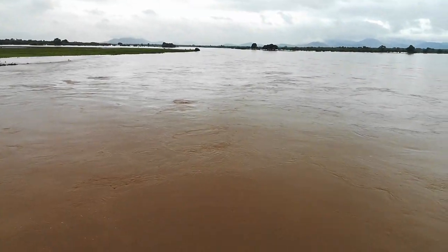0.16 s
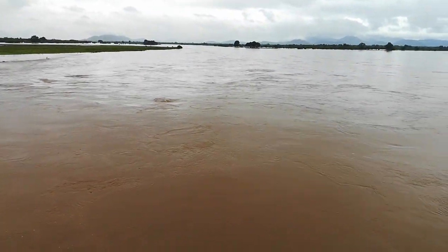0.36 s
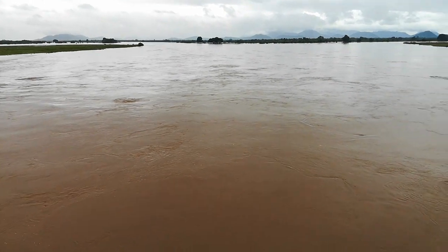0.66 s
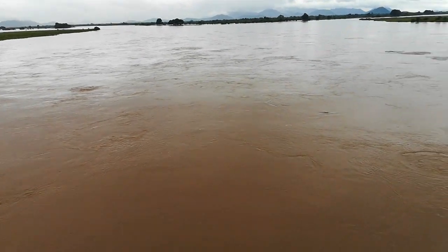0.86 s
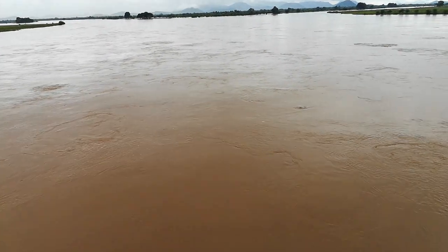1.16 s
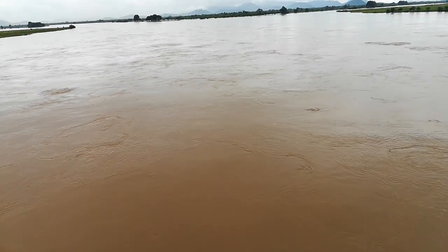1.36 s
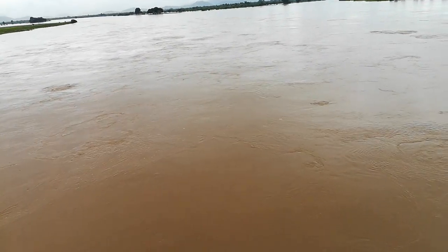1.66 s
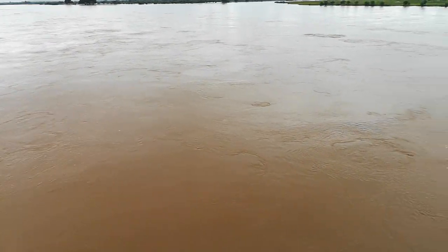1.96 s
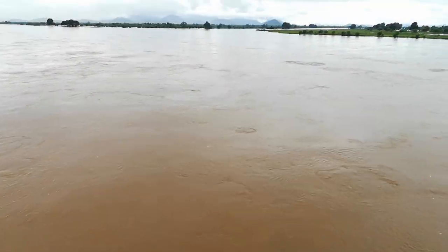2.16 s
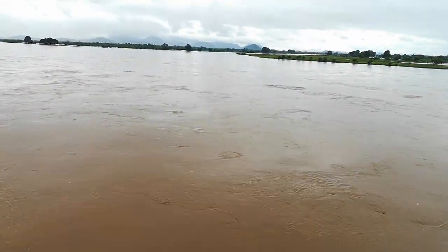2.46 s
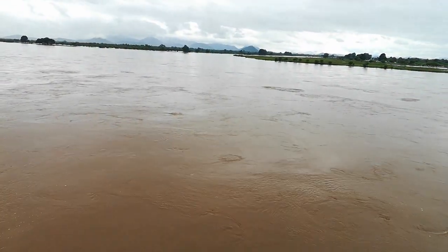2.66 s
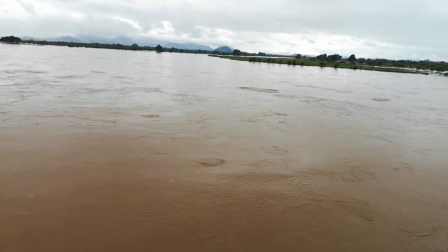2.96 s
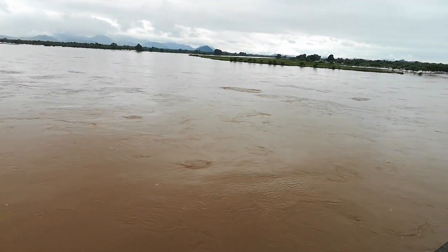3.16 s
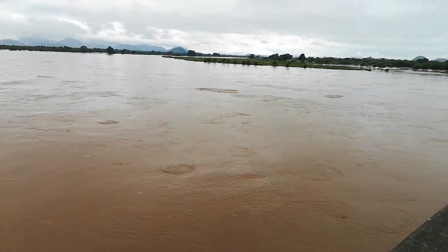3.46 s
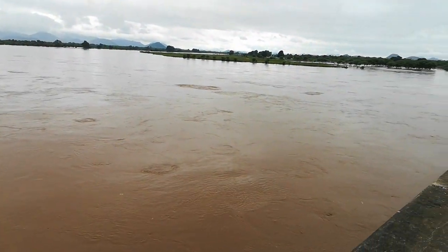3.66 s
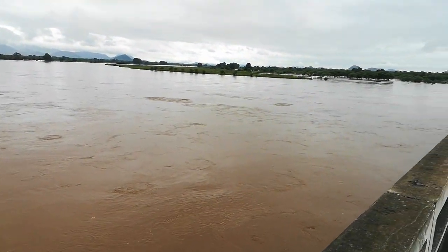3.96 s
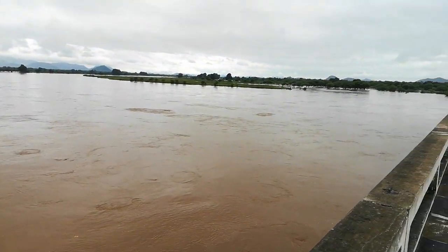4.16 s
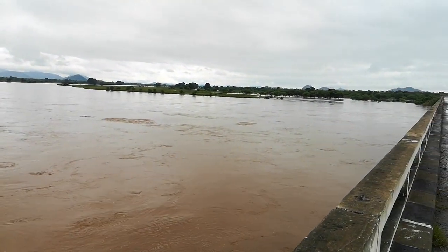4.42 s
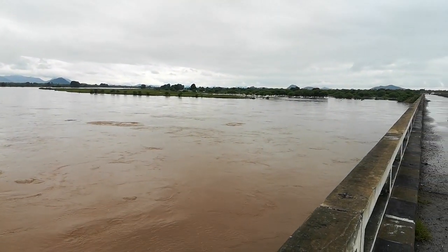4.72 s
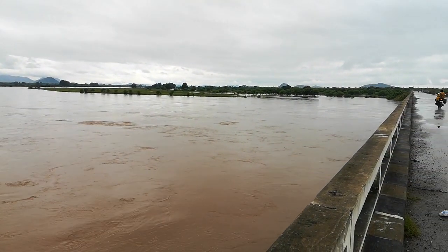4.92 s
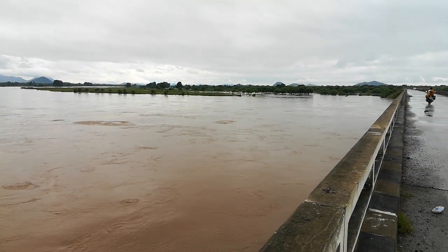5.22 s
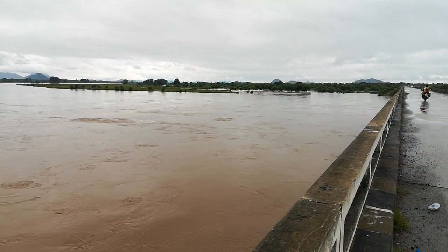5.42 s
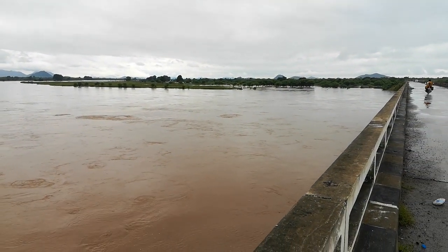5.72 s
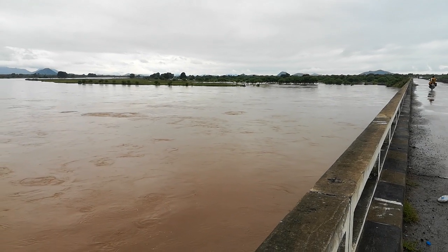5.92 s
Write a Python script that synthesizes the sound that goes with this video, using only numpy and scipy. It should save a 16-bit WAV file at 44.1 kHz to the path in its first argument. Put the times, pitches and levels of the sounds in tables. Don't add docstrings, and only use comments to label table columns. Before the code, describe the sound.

Wind thumps and pops on a hand-held microphone on a wet bridge as a single-cylinder engine thuds past, tyres hissing through spray and drops ticking.

```python
import sys
import numpy as np
from scipy import signal
from scipy.fft import rfft, irfft, next_fast_len
from scipy.io import wavfile
from scipy.ndimage import uniform_filter1d, map_coordinates

SR = 44100
rng = np.random.default_rng(int(sys.argv[2]) if len(sys.argv) > 2 else 0)


def gain_from_db(level_db):
    decades = np.asarray(level_db, float) / 20
    return 10 ** decades


def dump(signal):
    limited = np.clip(np.atleast_2d(signal).T, -1, 1)
    pcm = np.round(limited * 32767).astype(np.int16)
    wavfile.write(sys.argv[1], SR, pcm)


N = 268391


def unit(x):
    return x / np.sqrt(np.mean(x ** 2) + 1e-20)


def along(points, hz):
    f, v = np.transpose(points)
    return np.interp(np.log(hz + 1), np.log(f + 1), v)


def curves(rows):
    s, *cols = np.transpose(rows)
    return [np.interp(np.arange(N) / SR, s, c) for c in cols]


def full(coarse):
    return np.interp(np.arange(N), np.arange(0, N, 64), coarse)


def wobble(rate):
    knots = rng.standard_normal(int(N * 40 / SR) + 4)
    return full(map_coordinates(knots, [np.arange(0, N, 64) * min(rate, 40) / SR]))


def swells(rows):
    s, half, db = np.array(rows)[:, :3].T[:, :, None]
    u = (np.arange(0, N, 64) / SR - s) / half
    rise_over_fall = 0.97
    return db * np.exp(-np.where(u < 0, u / rise_over_fall, u) ** 2)


def filtered(x, response):
    m = next_fast_len(N + 8192)
    return irfft(rfft(x, m) * response(np.fft.rfftfreq(m, 1 / SR)), m)[..., :N]


def mode(f, hz, width):
    return 1j * f * width / (hz * hz - f * f + 1j * f * width)


def panned(x, db):
    return x * 2 / (1 + gain_from_db([-db, db]).reshape(2, -1))


# (f/Hz, lag/ms)
PORT_LAG_MS = [(60, .9), (330, 1.0), (650, .8), (1300, .4), (9000, .4)]
# (t/s, bearing -1 left to 1 right)
BEARING = [(0, 0.21), (.3, -0.46), (.7, -0.79), (1.5, -0.95), (1.85, -0.84), (2.1, 0.95), (4.5, 0.72),
           (6.09, 0.7)]


def lag(hz, t, side=1):
    bearing = side * np.interp(t, *np.transpose(BEARING))
    turn = np.pi * (hz * along(PORT_LAG_MS, hz) / 1000)[:, None] * bearing
    return np.exp([-1j * turn, 1j * turn])


def traffic_side(share=1):
    return -11.5 * share * curves(BEARING)[0]


def aside(x, side=1):
    hz, t, z = signal.stft(x, SR, nperseg=1024)
    return signal.istft(z * lag(hz, t, side), SR, nperseg=1024)[1][:, :N]


# (f/Hz, share 0-1)
ALIKE = [(60, .98), (160, .9), (330, .83), (650, .8), (1300, .4), (4000, .55), (7000, .54), (12000, .5)]


def rush(spectrum, patchy_db, grain=0, size_db=0, count=0, size=512):
    clicks = np.zeros(N)
    clicks[rng.integers(0, N, count)] = gain_from_db(size_db * np.minimum(rng.exponential(size=count), 3))
    burst = np.convolve(clicks, np.hanning(60))[:N]
    noise = rng.standard_normal((3, N)) * (1 + grain * unit(burst))
    hz, t, z = signal.stft(noise, SR, nperseg=size)
    patches = uniform_filter1d(rng.standard_normal(z.shape[1:]), size=8, axis=0)
    patches = uniform_filter1d(patches, size=9, axis=1)
    share = np.clip(along(ALIKE, hz), 0, 1)[:, None]
    z = np.sqrt(share) * z[0] * lag(hz, t) + np.sqrt(1 - share) * z[1:]
    z = z * gain_from_db(along(spectrum, hz)[:, None] + patchy_db * unit(patches))
    return unit(signal.istft(z, SR, nperseg=size)[1][:, :N])


# (t/s, level/dB)
WIND = [(0, -57.5), (.45, -42.5), (.9, -34), (1.5, -37), (2.2, -33.5), (3.1, -35.5), (3.9, -38), (4.7, -45),
        (5.2, -38), (6.09, -46)]
# (peak t/s, half length/s, swell/dB, share of the swell reaching the chesty band)
GUSTS = [(0, 0.14, 10, 1.4), (.19, 0.089, 13.5, 0), (.52, 0.057, 13.5, 0.06), (.65, 0.062, 14, 0.9),
         (.76, 0.074, 11, 0.36), (1.22, 0.041, 4, 0), (1.64, 0.15, 2, 2.8), (1.73, 0.025, 6, 0.1),
         (1.82, 0.026, -5, 0.1), (2.07, 0.08, 4, 0.3), (2.25, 0.091, 7, 1.3), (2.41, 0.1, 4, 1.7),
         (2.55, 0.16, 1.44, 5.7), (2.78, 0.033, 8, 1.1), (2.83, 0.012, -27.5, 0), (2.88, 0.015, 6.5, 0.7),
         (3.03, 0.11, 2, 4), (3.13, 0.084, 2.5, 2.34), (3.32, 0.065, 0.5, 0), (3.5, 0.043, 3.5, 0.4),
         (4.36, 0.14, 5.5, 0.7), (4.75, 0.27, 0.8, 5), (4.95, 0.052, 8.5, 0), (5.04, 0.022, -5, 0),
         (5.87, 0.074, 7, 0)]
# (t/s, level/dB)
TRAFFIC = [(0, -30), (.2, -51), (1.25, -42), (1.6, -32.5), (1.95, -35), (2.25, -33.5), (2.6, -33.5),
           (3.2, -34), (3.45, -35), (4, -35), (4.7, -38.5), (6.09, -38.5)]
# (f/Hz, level/dB)
DEEP = [(13, -34), (22, -14.5), (48, -7.5), (70, -5.5), (92, -4.5), (120, -4), (200, -120)]
# (f/Hz, level/dB)
HUM = [(56, -57), (95, -15.5), (129, 3), (167, 2), (230, -6), (300, -11.5), (510, -120)]
# (f/Hz, level/dB)
CHEST = [(130, -2.5), (225, -2.5), (290, -5), (323, -5), (356, -6.5), (600, -25.5), (780, -34),
         (1320, -120)]


def rumble():
    wind_db, gusts = curves(WIND)[0], swells(GUSTS)
    gust_db = full(gusts.sum(axis=0))
    bite_db = full(np.array(GUSTS)[:, 3] @ gusts)
    chest_db = -43.5 + 0.25 * (wind_db - wind_db.mean()) + bite_db
    lump = wobble(16)
    deep = gain_from_db(wind_db + gust_db + 1.0 + 0.62 * lump) * rush(DEEP, patchy_db=-2.1, size=8192)
    hum_db = curves(TRAFFIC)[0] + 0.23 * gust_db
    hum = gain_from_db(hum_db + 2.3 * lump) * rush(HUM, patchy_db=1.6, size=4096)
    chest = gain_from_db(chest_db + 3.5 + 0.44 * lump + 0.1 * wobble(25)) * rush(CHEST, patchy_db=1.2, size=2048)
    return (deep + hum) * gain_from_db([[-.2], [.2]]) + chest * gain_from_db([[-1.3], [1.3]])


# (closest t/s, roar level/dB, tread level/dB, growl level/dB, time to cover closest distance/s)
PASSES = [
    (.36, -52, -45, -71, 0.095),
    (1.98, -42.5, -47, -49, 0.098),
    (2.18, -49, -44.5, -48.5, .24),
]
# (peak t/s, half length/s, swell/dB)
JOINTS = [
    (2.325, 0.0049, 8.5),
    (3.64, 0.017, 13),
]
# (peak t/s, half length/s, swell/dB)
SURGES = [
    (.17, 0.15, -11),
    (1.5, 0.11, 4),
    (2.33, 0.11, -5.5),
    (3.05, .3, 4),
    (3.8, 0.18, 1.5),
    (5, .3, -1),
]
# (f/Hz, level/dB)
TYRES = [(500, -51), (720, -6.5), (868, -1), (1230, -5.5), (1600, -8), (1900, -11), (2470, -19),
         (4180, -120)]
# (f/Hz, level/dB)
GROWL = [(260, -55), (450, -3), (576, -1), (720, 0.5), (950, -27), (1500, -120)]
# (f/Hz, level/dB)
TREAD = [(1060, -4.5), (1800, -12.5), (2170, 0), (2430, -6), (2800, -3.5), (3640, -3), (6160, -120)]


def roar():
    s, roar_db, tread_db, growl_db, reach = np.transpose(PASSES)[:, :, None]

    def near(db, late=0, carries=1):
        away = (np.arange(N) / SR - s - late) / reach / carries
        return (gain_from_db(2 * db) / (1 + away ** 2)).sum(axis=0)

    tyres = near(roar_db)
    treads = near(tread_db, carries=2.18)
    growls = near(growl_db, late=0.14)
    level = tyres + gain_from_db(2 * -52)
    joint_db = full(swells(JOINTS).sum(axis=0))
    surge_db = full(swells(SURGES).sum(axis=0))
    pan_db = traffic_side(tyres / level) - 0.9

    low = np.sqrt(level) * gain_from_db(4.0 + 0.19 * joint_db + 0.77 * wobble(11))
    low = low * rush(TYRES, patchy_db=1.0, size=1024)
    growl = np.sqrt(growls + gain_from_db(2 * -57.5)) * gain_from_db(4.5 + surge_db + 0.47 * wobble(5.5))
    low = low + growl * rush(GROWL, patchy_db=0.9, size=1024)
    tread = np.sqrt(treads + gain_from_db(2 * -57)) * gain_from_db(0.5 + joint_db + 0.81 * wobble(5.33))
    tread = tread * rush(TREAD, patchy_db=1.5, grain=0.29, size_db=-9, count=500)
    return panned(low, pan_db) + panned(tread, 0.18 * pan_db - 0.5)


# (t/s, level/dB)
SPRAY = [(0, -51), (.25, -50.5), (.5, -40.5), (1.3, -43.5), (1.9, -39), (2.6, -40), (3.2, -42.5), (4, -48),
         (4.4, -53), (6.09, -56)]
# (peak t/s, half length/s, swell/dB, droplet pitch f/Hz)
PUDDLES = [(0.037, 0.02, 15, 5100), (0.043, 0.018, 11, 10600), (0.276, 0.14, 6.5, 8800),
           (0.504, 0.0056, 14, 7700), (0.79, 0.18, 8, 6200), (.842, .003, 11, 13500),
           (0.868, 0.18, -4.5, 8500), (0.95, 0.23, 10.5, 12500), (1.03, 0.25, 5, 3850),
           (1.053, 0.035, 5.5, 6200), (1.165, 0.12, 7.5, 8900), (1.264, 0.28, 6.5, 4200),
           (1.415, 0.19, 9.5, 8300), (1.54, 0.041, 18.5, 5320), (1.4, 0.43, 3.5, 12500),
           (1.13, .006, 6, 13300), (.505, 0.011, 2, 12500), (1.34, 0.0087, 11, 12500),
           (.86, 0.023, 2, 6600), (2.87, 0.013, 3, 4700), (3.31, 0.022, 5, 4300), (1.67, 0.06, 11.5, 5360),
           (2.195, 0.21, 7.5, 5660), (2.202, 0.082, 6, 12500), (2.26, 0.027, -10, 8550),
           (2.53, 0.22, 4.5, 8600), (2.69, .06, 1, 12500), (3.03, 0.022, 2.5, 6700), (3.3, 0.49, -7, 13100),
           (3.405, 0.14, 25, 2950), (3.728, 0.14, 4, 5070), (4.64, 0.11, 9, 11000), (4.73, 0.18, 5, 4830),
           (4.96, 0.16, 8, 12500), (4.967, 0.073, 3.5, 6700), (5.723, 0.12, 4, 4400)]
# (pitch f/Hz, level at middling spray/dB, growth with the spray dB/dB)
DROPLETS = [
    (4200, -47, 0.53),
    (6550, -44.5, 0.8),
    (8600, -52, 0.41),
    (12500, -67.5, 0.76),
]
# (f/Hz, level/dB)
SPLASH = [(1530, -23), (2600, 0.5), (3150, 1.5), (3750, 2), (4550, 7.5), (5280, 5.5), (5800, -1),
          (11000, -60)]
# (f/Hz, level/dB)
SIZZLE = [(3060, -24), (5200, -8), (6690, 4), (8200, -6), (10700, -66), (18000, -120)]
# (f/Hz, level/dB)
FIZZ = [(4650, -17), (7900, -1), (9100, -7.5), (10300, -19.5), (13400, -32), (22000, -120)]
# (f/Hz, level/dB)
MIST = [(6000, -34), (10200, 0), (14600, -4.5), (15600, -8.5)]
# (t/s, level/dB)
SLOSH = [
    (5.45, -71),
    (5.58, -51.5),
    (5.7, -48.5),
    (5.8, -50),
    (5.84, -82),
]
# (f/Hz, level/dB)
FAR_PUDDLE = [(1240, -41), (2100, -1), (2480, 10), (3400, 3), (3900, -12), (4810, -37), (8140, -120)]


def spray():
    more_db = curves(SPRAY)[0] + 45
    puddles, pitch = swells(PUDDLES), np.array(PUDDLES)[:, 3]
    levels = []
    for hz, db, grows in DROPLETS:
        kinship = np.exp(-(np.log2(pitch / hz) / 0.34) ** 2)
        puddle_db = full(kinship @ puddles)
        levels.append(db + grows * more_db + puddle_db)
    splash_db, sizzle_db, fizz_db, mist_db = levels
    pan_db = -13.5 - 0.45 * more_db + 0.55 * wobble(6.23)
    mist_pan_db = -1.5 - 0.73 * puddle_db

    swell = wobble(9.9)
    splash = gain_from_db(splash_db + 1.5 + 0.2 * swell)
    splash = splash * rush(SPLASH, patchy_db=1.5, grain=0.37, size_db=-3, count=600)
    sizzle = gain_from_db(sizzle_db + 3.0 + 0.25 * swell)
    sizzle = sizzle * rush(SIZZLE, patchy_db=1.5, grain=0.27, size_db=-5.0, count=900)
    fizz = gain_from_db(fizz_db + 4.5 + 0.29 * swell)
    fizz = fizz * rush(FIZZ, patchy_db=1.5, grain=0.31, size_db=-1, count=900)
    mist = gain_from_db(mist_db + 4.5 + 0.34 * swell)
    mist = mist * rush(MIST, patchy_db=1.5, grain=0.17, size_db=-7, count=300)
    slosh = gain_from_db(curves(SLOSH)[0]) * rush(FAR_PUDDLE, patchy_db=2.5, grain=0.46, size_db=-5, count=900)
    coarse = panned(splash, 0.5 * pan_db) + panned(sizzle, pan_db)
    fine = panned(fizz, 0.69 * pan_db) + panned(mist, mist_pan_db)
    return coarse + fine + slosh


# (t/s, peak level/dB, half width/ms)
POPS = [(.003, -20, .6), (.0165, -21, .5), (.0228, -14, .35), (.041, -13, .3), (.0485, -16, .5),
        (.0555, -20, .6), (.1035, -17, .7), (.64, -20, 1), (.655, -16, .6), (2.535, -12, .4),
        (2.6, -29, .5), (3.06, -23, 1), (3.13, -23, 1)]


def pops():
    out = np.zeros((2, N + 600))
    t = np.arange(-300, 300) / SR - [[.0007], [0]]
    for s, db, ms in POPS:
        u = t / ms * 1000
        push = (1 - .6 * u ** 2) * np.exp(-u ** 2 / 2)
        out[:, round(s * SR):][:, :600] += gain_from_db(db) * push * gain_from_db([[-4], [0]])
    return out[:, 300:N + 300]


# (t/s, firings so far)
CRANK = [(-.005, 0), (.291, 8), (.59, 16), (.817, 22), (1.0055, 27), (1.4225, 38), (1.7222, 46),
         (1.8687, 50), (2.1295, 57), (3.241, 87)]
# (t/s, level/dB)
EXHAUST = [(0, -31), (.2, -29), (.55, -28), (.8, -28), (1.05, -30), (1.3, -36), (1.65, -36), (1.9, -32),
           (2.15, -31), (2.35, -36), (3.2, -46)]
# (t/s, share 0-1)
AWAY = [
    (.65, 0),
    (.9, 1),
    (1.5, 1),
    (2, .2),
]


def engine():
    s, firings = np.transpose(CRANK)
    at = np.interp(np.arange(1, firings[-1]), firings, s) - .0079
    chance = rng.standard_normal((len(at), 2))
    puffs = np.zeros(N)
    puffs[np.round((at + .0002 * chance[:, 0]) * SR).astype(int)] = gain_from_db(.8 * chance[:, 1])

    def pipe(hz, width, order):
        return unit(filtered(puffs, lambda f: mode(f, hz, width) ** order - .035 * mode(f, 325, 60) ** 2))

    away = curves(AWAY)[0]
    sound = (1 - away) * pipe(151, 98, order=3) + away * pipe(159, 78, order=3)
    return aside(gain_from_db(curves(EXHAUST)[0] - 1.4) * sound, side=.35)


def cracks(table, bright, pan_db, near_db):
    out, t, f = np.zeros(N + 900), np.arange(900) / SR, np.fft.rfftfreq(900, 1 / SR)
    for s, db, hz, low_db in table:
        crack = rng.standard_normal((2, 900)) * gain_from_db(-60 * t / 0.009) * (1 - np.exp(-t / 0.0004))
        ring = mode(f, hz, 740) ** 2 + bright * mode(f, 6860, 3300) ** 2
        body = gain_from_db(low_db - 2) * mode(f, 3000, 1300) ** 2
        tone = np.array([ring, body]) / (1 + (f / 9200) ** 9)
        hit = irfft(rfft(crack) * tone, 900).sum(axis=0)
        out[round(s * SR):][:900] += gain_from_db(db + near_db) * hit / np.abs(hit).max()
    return panned(aside(out[:N]), pan_db)


# (t/s, peak level/dB, pitch f/Hz, low part level/dB)
DROPS = [(0.122, -29, 6600, -6), (0.22, -30, 6550, -17), (0.3511, -30, 6790, -22),
         (0.384, -22.5, 6680, -21), (0.5012, -16, 6620, -10), (0.5352, -18.5, 6750, -24),
         (0.5935, -29, 6860, -21), (0.636, -21, 6300, -23), (0.6704, -20, 6600, -24),
         (0.743, -19.5, 6780, -31), (0.9991, -24, 6200, -19), (1.0357, -24, 6510, -18),
         (1.2176, -18, 6430, -7), (1.341, -18, 6300, -16), (1.5946, -25, 7350, -19),
         (1.6067, -19, 6250, -9), (1.6521, -22, 7070, -12), (1.7652, -26.5, 6100, -6),
         (1.7927, -29, 6060, -18), (1.8736, -37, 6380, -17), (1.942, -21.5, 6400, -22),
         (1.9866, -24, 6220, -18), (2.0817, -22.5, 6100, -21), (2.3366, -28, 7370, -21),
         (2.4134, -22, 6900, -24), (2.536, -22, 6750, -18), (2.565, -32, 7090, -14),
         (2.7137, -26, 6650, -21), (2.8075, -31, 7160, -10), (2.8255, -29, 6740, -18),
         (2.905, -26, 7280, -26), (2.9877, -30, 6160, -18), (3.0678, -24, 7000, -36),
         (3.114, -31, 7100, -19), (3.5907, -28.5, 7250, -18), (3.7509, -28, 6850, -14),
         (3.859, -33, 7300, -11), (3.9804, -42, 6410, -9)]
# (t/s, peak level/dB, pitch f/Hz, low part level/dB)
DRIPS = [(.2608, -34, 3110, -10), (1.0834, -29, 4440, -12), (1.1702, -21, 4390, -14),
         (1.267, -29, 4280, -12), (1.3399, -17.5, 4660, -22), (2.1989, -25.5, 3560, -9),
         (2.3146, -36, 2240, -8), (4.2582, -38, 3930, -12), (4.4662, -35, 3740, -7),
         (0.2905, -32, 2980, -1), (2.4131, -39, 4890, -6), (2.4535, -22.5, 4730, 0),
         (2.4977, -25, 4020, -6), (2.5998, -26, 4380, -5), (2.685, -26, 4700, -16), (2.772, -39, 5200, -2),
         (3.0004, -31, 5020, -20), (3.1384, -30.5, 2780, 0), (3.634, -30, 2200, 0), (3.6902, -38, 3200, -6),
         (3.811, -32.5, 3170, -15), (3.863, -35, 4460, 5), (3.9805, -32, 3770, -15),
         (4.1044, -35, 3900, -10), (4.197, -32.5, 3900, -17), (4.581, -33, 3630, -3)]


def drops():
    big = cracks(DROPS, bright=0.35, pan_db=-17.0, near_db=2.0)
    return big + cracks(DRIPS, bright=0.075, pan_db=-25, near_db=-0.5)


# (t/s, pitch f/Hz, level/dB)
WHINE = [(1.1, 1120, -72), (1.55, 1115, -64), (1.64, 1112, -57), (2.05, 1050, -53), (2.22, 1035, -48.5),
         (2.42, 1032, -56), (2.95, 1045, -60), (3.02, 1100, -61.5), (4.3, 1100, -63.5), (4.7, 1100, -80)]


def whine():
    hz, level_db = curves(WHINE)

    def line(pitch, rate, db):
        level = gain_from_db(2.5 * wobble(rate) + db)
        return level * np.sin(2 * np.pi * np.cumsum(pitch * (1 + .012 * wobble(38))) / SR)

    gears = line(hz, rate=25, db=0) + line(2120, rate=30, db=-3)
    return panned(aside(gain_from_db(level_db + 8.2) * gears, side=.7), traffic_side(.7))


def scene():
    return rumble() + roar() + spray() + pops() + engine() + drops() + whine()


def band_limit(x):
    return signal.sosfilt(signal.butter(12, 15750, fs=SR, output="sos"), x)


def record(dry):
    return band_limit(dry)


dry = scene()
out = record(dry)
dump(out)
```